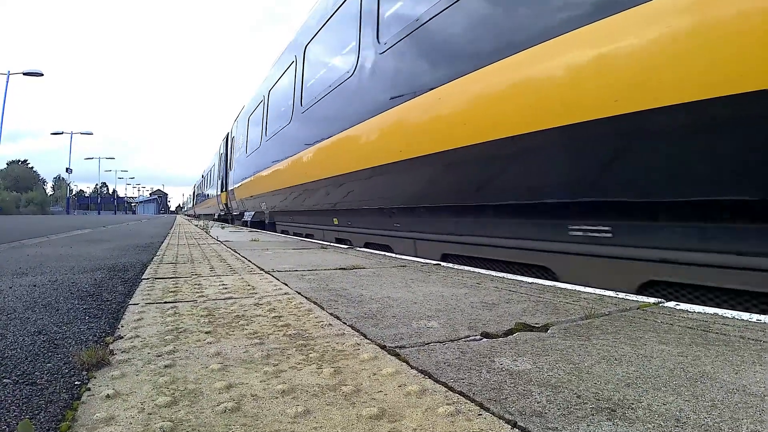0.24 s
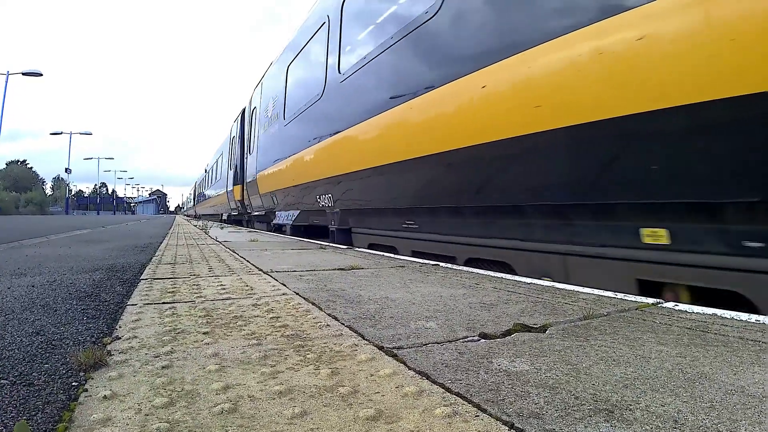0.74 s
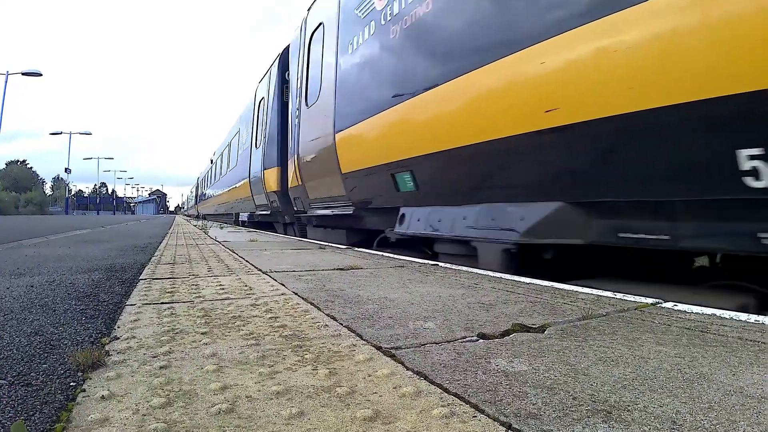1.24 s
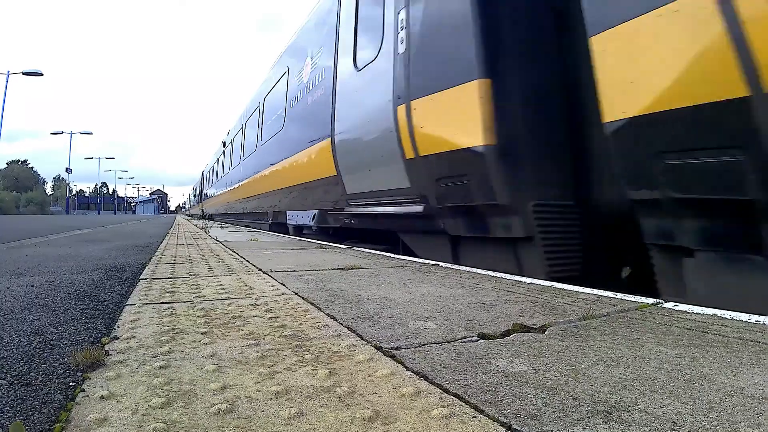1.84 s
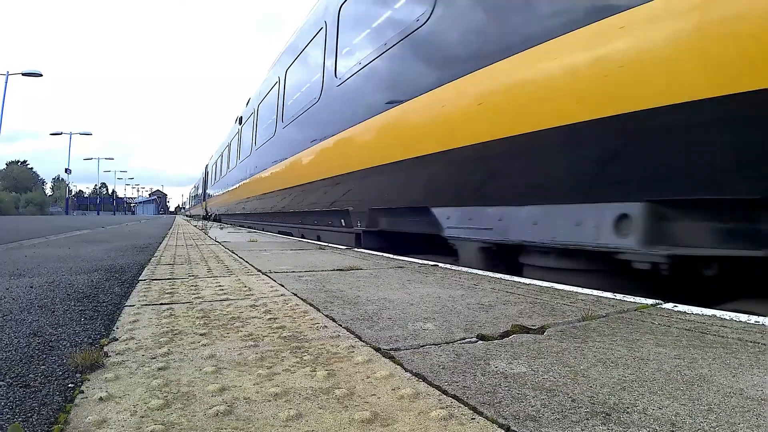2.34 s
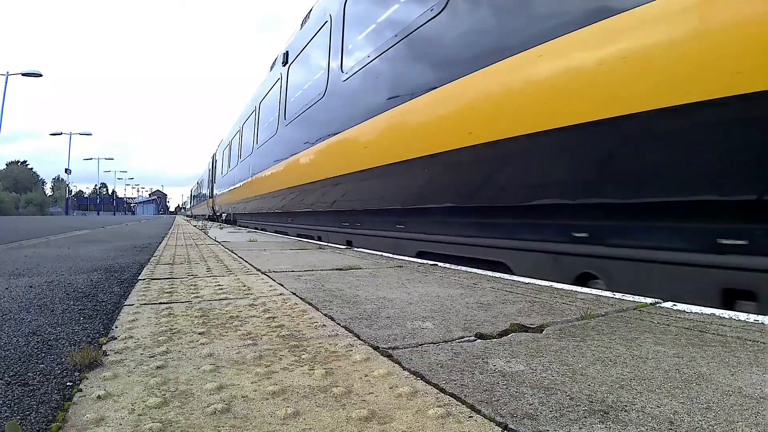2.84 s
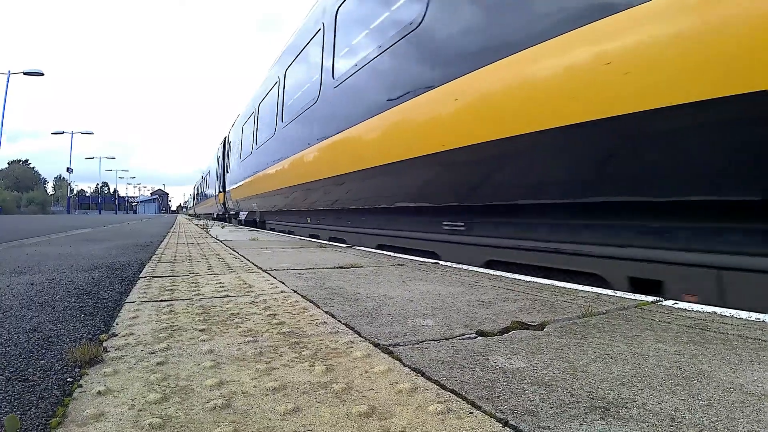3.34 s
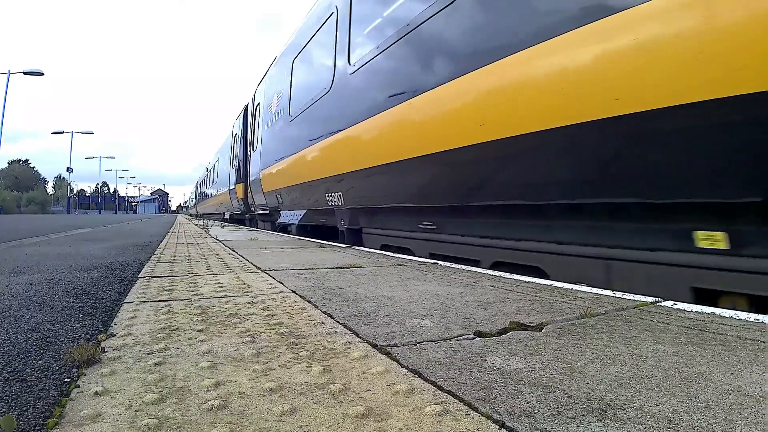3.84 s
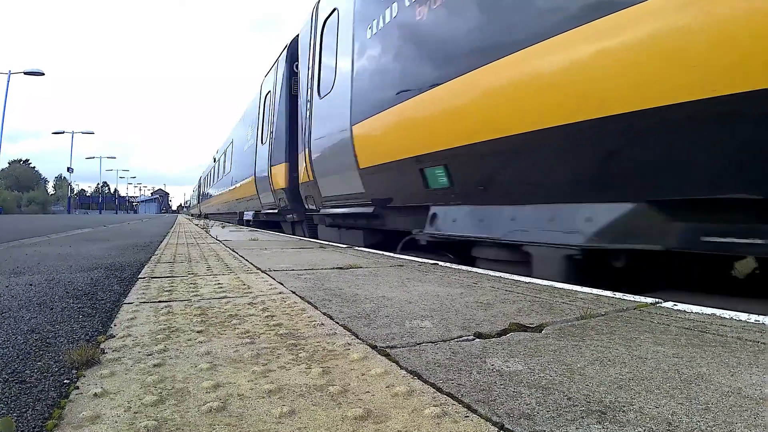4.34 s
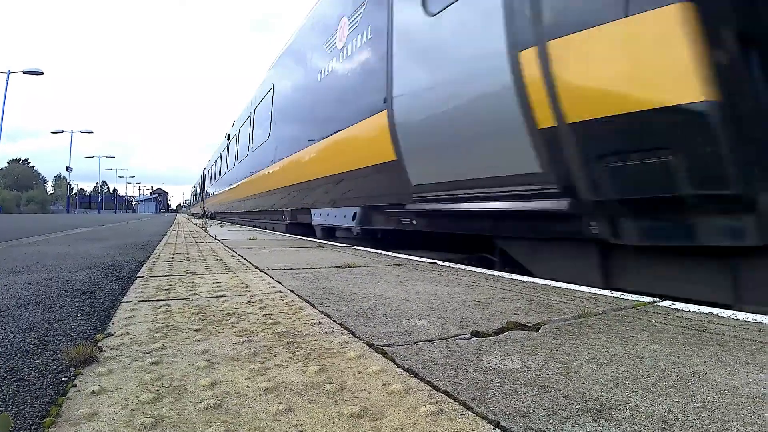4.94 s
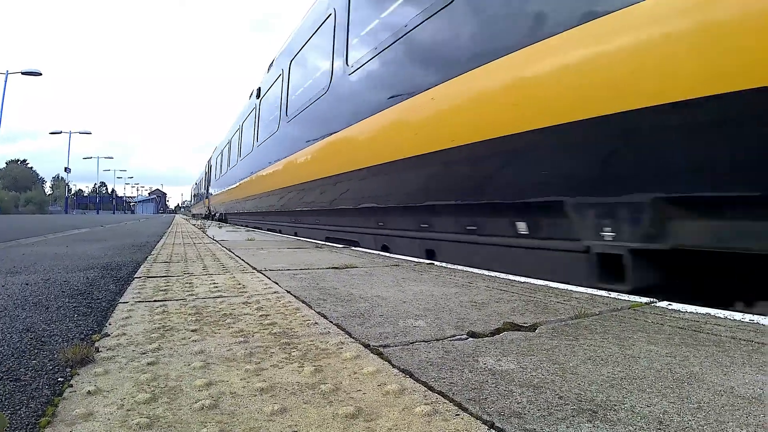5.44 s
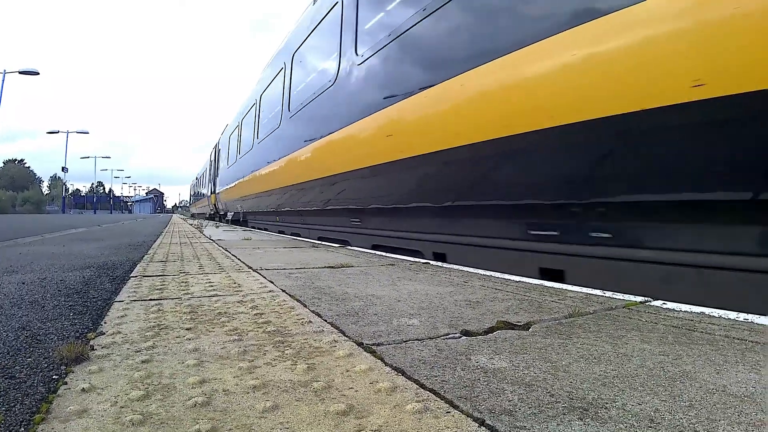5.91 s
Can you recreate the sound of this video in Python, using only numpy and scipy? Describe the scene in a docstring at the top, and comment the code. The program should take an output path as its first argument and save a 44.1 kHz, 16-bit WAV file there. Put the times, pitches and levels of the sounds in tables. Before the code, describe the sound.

A diesel train rolls past very close, its engines booming and throbbing over rumbling wheels and a few dull knocks.

```python
"""A diesel train rolls past, a metre from a microphone on the platform.
The exhausts of its underfloor engines boom, swelling, throbbing and cancelling each other.
One engine clatters by near the start, and a second draws level at the end.
Wheels rumble and knock on the rail, steel rubs and creaks, and the draught buffets the microphone.
The overloaded recorder flattens the loudest peaks, crackles faintly and cuts off the treble."""
import sys
import numpy as np
from scipy import signal
from scipy.fft import rfft, irfft, next_fast_len
from scipy.io import wavfile
from scipy.ndimage import uniform_filter1d, map_coordinates

SR = 44100
rng = np.random.default_rng(int(sys.argv[2]) if len(sys.argv) > 2 else 0)


def unload_wav(signal):
    """Save mono or channel-first audio to the path in sys.argv[1] as 16-bit WAV at rate SR, clipped to [-1, 1]."""
    wavfile.write(
        sys.argv[1],
        SR,
        np.round(np.clip(np.atleast_2d(signal).T, -1, 1) * 32767).astype(np.int16),
    )


N = 272097


def amp(db):
    """Turn decibels into a number to multiply by."""
    return 10 ** (np.asarray(db) / 20)


def unit(x):
    """Scale a signal to an average (rms) level of 1."""
    return x / np.sqrt(np.mean(x ** 2) + 1e-20)


def since(s):
    """Seconds since time s, for every sample."""
    return np.arange(N) / SR - s


def swell(s, half_width_s):
    """A smooth bump of height 1 around time s."""
    return np.exp(-(since(s) / half_width_s) ** 2)


def curves(rows):
    """Join timed rows with straight lines: one curve for each column after the time."""
    times, *columns = np.transpose(rows)
    return [np.interp(since(0), times, column) for column in columns]


def wobble(rate):
    """A smooth curve through `rate` random values a second."""
    points = rng.standard_normal(int(N * rate / SR) + 4)
    return map_coordinates(points, [np.arange(N) * rate / SR])


def filtered(x, response):
    """Multiply each frequency in x by the gain response(hz)."""
    size = next_fast_len(N + SR // 2)
    return irfft(rfft(x, size) * response(np.fft.rfftfreq(size, 1 / SR)), size)[:N]


def rush(spectrum, patchy_db):
    """Noise of level 1, shaped by a spectrum, with random louder and softer patches."""
    slices = signal.stft(rng.standard_normal(N), nperseg=2048)[2]
    patches = uniform_filter1d(rng.standard_normal(slices.shape), size=4, axis=0)  # blur in pitch
    patches = uniform_filter1d(patches, size=7, axis=1)  # blur in time
    noise = signal.istft(slices * amp(patchy_db * unit(patches)), nperseg=2048)[1][:N]
    freqs, db = np.transpose(spectrum)
    return unit(filtered(noise, lambda hz: amp(np.interp(np.log(hz + 1), np.log(freqs), db))))


def tone(phase, waver_db, drift):
    """A pure note of level about 1 that wavers in loudness and drifts in phase (radians)."""
    level = np.sqrt(2) * amp(waver_db * wobble(7))
    return level * np.sin(phase + drift * wobble(6) + rng.uniform(0, 2 * np.pi))


def cancelling():
    """Gain of the boom: it dips sharply when one engine's wave pushes while another's pulls."""
    # Each row: time in seconds, depth of the dip in dB.
    dips = [(.382, 17), (.731, 23), (1.081, 11.5), (1.416, 4.7), (3.996, 8.3), (4.325, 16), (4.606, 11),
            (5.147, 14.5), (5.381, 4.5), (5.524, 26), (5.804, 6), (5.968, 7.5)]
    gain = np.ones(N)
    for s, depth_db in dips:
        overlap = swell(s, .066 + .0011 * depth_db)  # deeper dips last longer
        gain *= np.sqrt(1 - (1 - amp(-depth_db) ** 2) * overlap)
    return gain


def exhaust(phase):
    """The firing cylinders make a booming note; their unevenness adds tones between its overtones."""
    # Each row: time in seconds, level in dB of all the booms together, before the dips.
    boom_levels = [(0, -11.5), (.2, -3.6), (.92, -2.8), (1.3, -5), (1.88, 1.5), (2.45, -4.2), (2.91, -6.3),
                   (3.41, -13.4), (3.76, -9.3), (4.46, -7.7), (4.8, -10.5), (5, -7.4), (5.35, -11.5),
                   (5.67, -5.2), (6.17, -3.7)]
    # Each row: multiple of the firing rate, level in dB before it follows the boom.
    exhaust_tones = [(1.5, -35), (2.5, -36.5), (3, -33), (3.5, -33), (4, -36.5)]
    # Each row: time in seconds, lift in dB of the deep throb at half the firing rate.
    surges = [(.06, 11), (1.42, 11), (1.69, 9), (2.5, 10), (2.86, 11.5), (3.87, 5), (5.72, 6)]
    boom_db, = curves(boom_levels)
    level = amp(boom_db) * cancelling()
    slip = np.imag(signal.hilbert(np.log(level)))  # the wave shifts in phase as its level dips
    boom = np.sqrt(2) * level * amp(.75 * wobble(26)) * np.sin(phase - .5 * slip)
    overtones = sum(amp(db) * tone(order * phase, waver_db=2.5, drift=.87) for order, db in exhaust_tones)
    surge_db = sum(db * swell(s, .125) for s, db in surges)
    deep_throb = amp(-23.3 + surge_db) * tone(phase / 2, waver_db=1.5, drift=1.4)
    # the octave (twice the firing rate) beats against that of a slightly slower engine
    beat_hz = 6.7
    octave = amp(-25) * tone(2 * phase, waver_db=3, drift=.7)
    octave += amp(-30) * tone(2 * phase - 2 * np.pi * beat_hz * since(0), waver_db=.5, drift=.91)
    flare = amp(12 * swell(1.73, .09))  # an exhaust outlet passes
    follow_boom = amp(1.5 + .6 * boom_db)
    return boom + follow_boom * (deep_throb + flare * octave + overtones)


def engines(phase):
    """Burning fuel and valves clatter, the block and its drives whine; both grow as an engine nears."""
    # Each row: frequency in Hz, relative strength of the clatter in dB.
    clatter_spectrum = [(120, -18.5), (300, -11.5), (550, 0), (800, -4.5), (980, -3), (1300, -1.5),
                        (1550, -1), (2200, -11.5), (2800, -13.5), (3500, -23), (4200, -24.5)]
    # Each row: multiple of the firing rate, relative level in dB.
    whine_tones = [(2.65, -6), (3, -5), (3.36, -5), (5.9, -3.5), (7.66, -12), (8.01, -3.5), (9.36, -9.5),
                   (13.97, -6), (18.78, -16.5), (23.32, -15)]
    # Each row: second when an engine is opposite, its clatter then in dB, whine offset in dB.
    passes = [(.76, -19, -3), (6.4, -22.3, -5)]
    pulsing = 1 + .2 * np.cos(2 * phase) + .11 * np.cos(phase / 2) + .053 * np.cos(phase)
    clatter = unit(pulsing * rush(clatter_spectrum, patchy_db=2.5))
    whine = sum(amp(db) * tone(order * phase, waver_db=1.6, drift=.6) for order, db in whine_tones)
    pass_s = .61  # time to travel as far as the microphone is from the track
    out = np.zeros(N)
    for s, db, whine_db in passes:
        distance_squared = 1 + (since(s) / pass_s) ** 2
        nearness = amp(db - 25 * np.log10(distance_squared))
        facing_db = 8.7 * swell(s, .085)  # the whine beams out sideways
        out += nearness * (clatter + amp(whine_db + facing_db) * whine)
    return out


def wheels_and_draught():
    """Rough wheels shake their frames and make the rail roar; the draught rises with the rumble."""
    # Each row: time in seconds, relative rumble level in dB, relative rail level in dB.
    wheel_levels = [(0, -15.5, -23.3), (.45, -15.7, -19.3), (1.08, -14, -17.5), (1.45, -15.5, -21.3),
                    (1.57, -16, -25.5), (1.9, -17.3, -28.7), (2.65, -22.5, -30.5), (2.95, -25, -33),
                    (3.5, -26.3, -35.1), (4.1, -27.3, -34.6), (4.6, -21, -30.8), (5.35, -18.2, -29.6),
                    (5.95, -14.6, -20.3), (6.17, -13.7, -21.7)]
    # Each row of these three: frequency in Hz, relative strength in dB.
    draught_spectrum = [(8, -22.5), (18, 1), (30, -1.5), (55, -3), (80, -6), (150, -14), (500, -60.5)]
    rumble_spectrum = [(50, -15), (115, -0.5), (160, -0.5), (205, -5.5), (290, 0.5), (380, -5.5),
                       (500, -7.5), (650, -17), (1000, -29.5), (2500, -58.5)]
    rail_spectrum = [(300, -15.5), (600, -3), (820, -1), (1000, -.7), (1320, -.8), (1500, -5.8), (1900, -9),
                     (2350, -13), (2700, -23.5), (3400, -29), (4200, -38.5)]
    rumble_db, rail_db = curves(wheel_levels)
    draught = amp(rumble_db - 4.3 + 1.5 * wobble(5)) * rush(draught_spectrum, patchy_db=1)
    rumble = amp(rumble_db - 1 + 1.2 * wobble(22)) * rush(rumble_spectrum, patchy_db=2.5)
    rail = amp(rail_db + 1.5 + .42 * wobble(40)) * rush(rail_spectrum, patchy_db=2.5)
    return draught + rumble + rail


def knocks():
    """Each jolt of a wheel makes a short, dull burst of noise in the frame that holds it."""
    # Each row: start in seconds, level in dB, rough pitch in Hz, seconds to fade by 60 dB.
    jolts = [(.919, -9.5, 1100, .053), (1.657, -15, 801, .12), (2.028, -13.5, 849, .03),
             (2.254, -19, 800, .035), (2.643, -29, 848, .2), (3.167, -27.5, 500, .06),
             (4.646, -21.5, 335, .11), (4.827, -22.5, 690, .09), (5.245, -22.5, 500, .097),
             (5.505, -19.5, 800, .22), (5.69, -14.5, 650, .086)]
    out = np.zeros(N + SR)
    t = np.arange(SR // 4) / SR
    for s, db, hz, fade_s in jolts:
        band = signal.butter(2, [hz / 1.8, hz * 1.41], "bandpass", fs=SR, output="sos")
        burst = unit(signal.sosfilt(band, rng.standard_normal(len(t))))
        out[round(s * SR):][:len(t)] += amp(db - 60 * t / fade_s) * burst
    return out[:N]


def creaks():
    """Steel rubs on steel under the train: brief rising notes that swell and fade."""
    # Each row: peak time in seconds, level in dB, pitch in Hz, rise in octaves a second.
    rubs = [(2.669, -28.5, 855, .5), (3.05, -29, 790, 2), (3.079, -32, 938, 5), (4.834, -20.5, 514, .5),
            (5.128, -30.5, 1340, 2.5)]
    half_width_s = .014
    out = np.zeros(N)
    for s, db, hz, rise in rubs:
        octaves = rise * np.clip(since(s), -2 * half_width_s, 2 * half_width_s)
        phase = 2 * np.pi * np.cumsum(hz * 2 ** octaves) / SR
        rough_note = tone(phase, waver_db=1, drift=.3) * amp(2 * wobble(150))
        out += amp(db) * swell(s, half_width_s) * rough_note
    return out


def scene():
    """Exhaust and engines keep to one firing rhythm while the wheels run underneath."""
    # Each row: time in seconds, cylinder firings heard per second.
    firing_rates = [(0, 90.13), (.5, 91.18), (1.8, 92.06), (2.05, 91.3), (2.35, 89.34), (3.9, 89.02),
                    (5, 91.1), (5.5, 93.32), (6.17, 96.78)]
    firing_hz, = curves(firing_rates)
    phase = 2 * np.pi * np.cumsum(firing_hz) / SR  # one full turn for each firing
    return (exhaust(phase) + engines(phase) + wheels_and_draught() + knocks() + creaks())[None]


def record(dry):
    """The input overloads, a steep filter cuts the treble, and peaks that overshoot crackle faintly."""
    ceiling, crackle_limit = .71, .716
    cutoff_hz, top_hz = 3850, 15870
    flattened = np.clip(dry[0], -ceiling, ceiling)
    grit = amp(-42) * (flattened / ceiling) ** 8 * rng.standard_normal(N)  # rides on the flat peaks
    muffled = filtered(flattened + grit, lambda hz: 1 / np.sqrt(1 + (hz / cutoff_hz) ** 44))
    crackle = np.clip(muffled, -crackle_limit, crackle_limit) - muffled
    sputter = amp(-.3 + 2.2 * wobble(60))
    hiss = amp(-97) * rng.standard_normal(N)
    return filtered(muffled + sputter * crackle + hiss, lambda hz: hz < top_hz)[None]


dry = scene()
out = record(dry)
unload_wav(out)
```